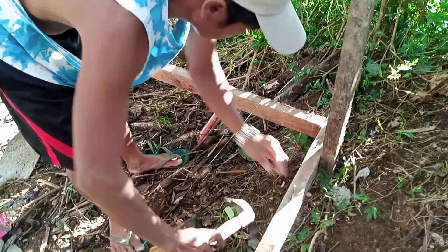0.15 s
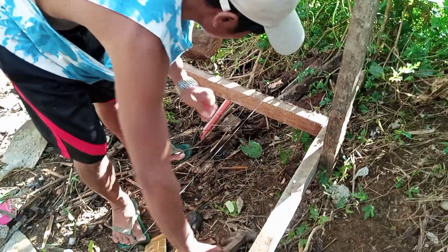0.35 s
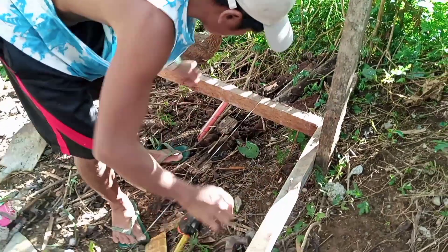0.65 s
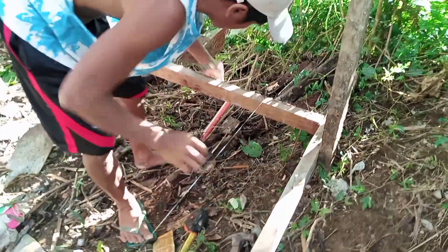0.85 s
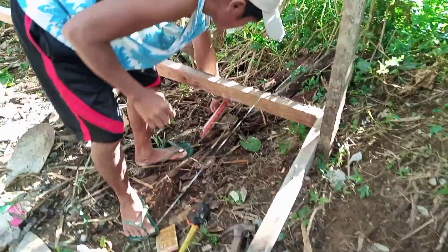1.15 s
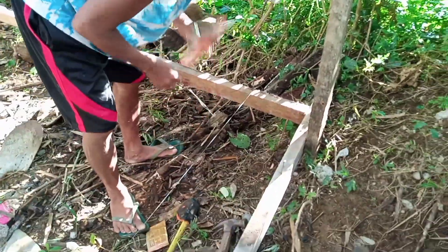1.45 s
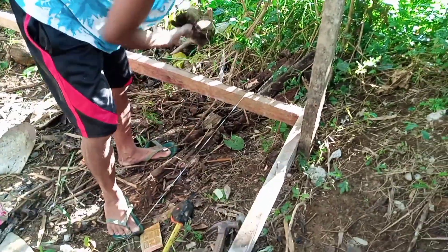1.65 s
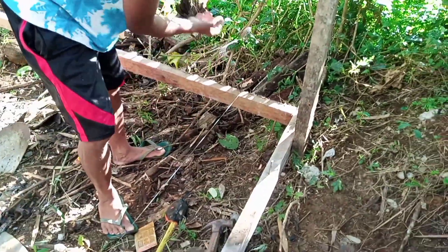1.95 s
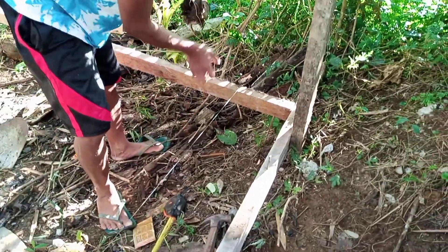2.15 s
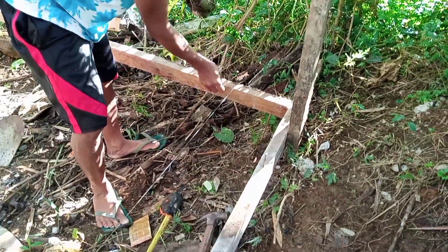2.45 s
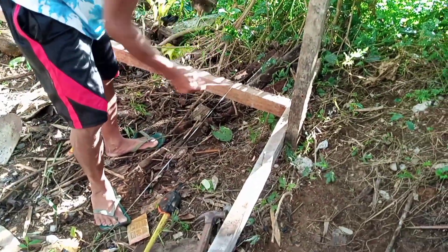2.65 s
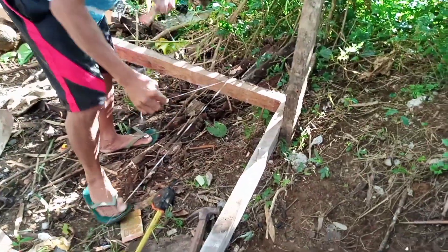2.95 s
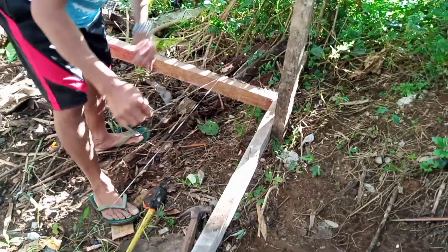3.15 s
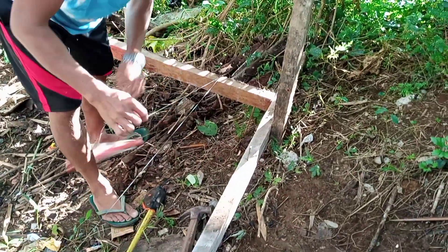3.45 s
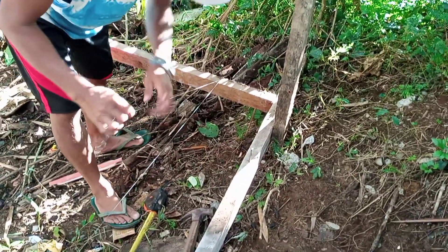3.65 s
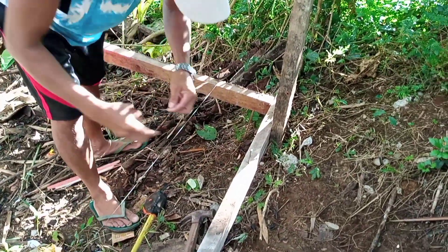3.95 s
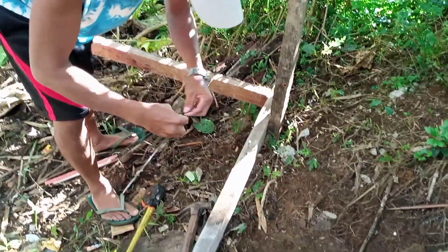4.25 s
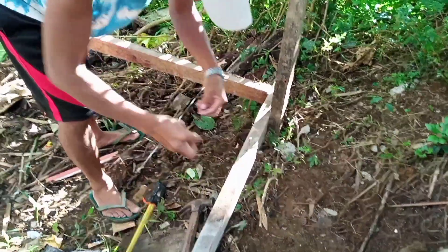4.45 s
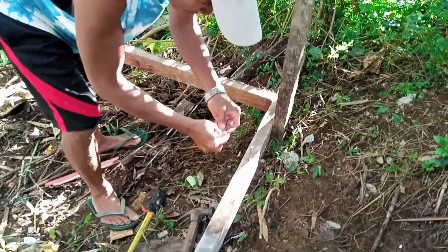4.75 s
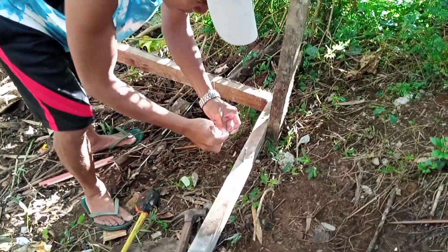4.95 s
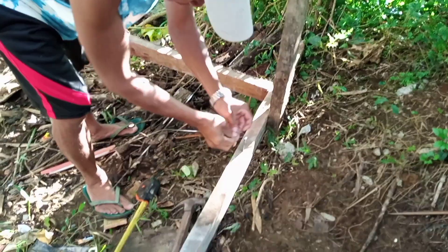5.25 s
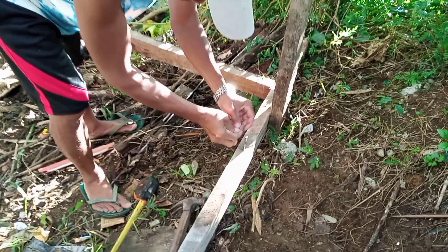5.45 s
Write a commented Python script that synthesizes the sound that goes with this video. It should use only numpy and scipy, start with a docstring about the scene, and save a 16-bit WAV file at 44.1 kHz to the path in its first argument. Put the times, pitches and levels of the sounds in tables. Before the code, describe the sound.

Close wooden knocks and scuffs in dry litter open the scene, followed by a single loud rooster crow with a brief metallic clatter near its end. Afterwards it grows quieter: soft rustles, small twig snaps, thinning chick peeps, distant fowl calls and faint dog yaps. A low far engine and thin high hiss run throughout, recorded in open air with light echoes from yard and trees.

```python
"""Farmyard rooster and timber work

A rooster crows once: harmonics through a throat filter, with flutter and rasp where the voice is rough.
A hammer scrapes and knocks on a timber frame, and feet shift in dry litter: noise bursts and crackle.
A piece of metal clatters as the crow ends: chattering contacts ring its modes. Chicks peep as gliding
whistles. Far off, harmonic tones make a yapping dog and other fowl, and an engine throbs in filtered
beats under a steady high hiss of coloured noise."""
import sys
import numpy as np
from scipy import signal
from scipy.fft import rfft, irfft
from scipy.io import wavfile
from scipy.ndimage import uniform_filter1d

SR = 44100
rng = np.random.default_rng(int(sys.argv[2]) if len(sys.argv) > 2 else 0)


def generate_wav(sig):
    """Save sig (samples, or channels by samples) to the path in sys.argv[1] as 16-bit PCM at SR."""
    pcm = np.round(np.clip(np.atleast_2d(sig).T, -1, 1) * 32767).astype(np.int16)
    wavfile.write(sys.argv[1], SR, pcm)


N = 247621

# spectrum of the hiss: f/Hz, level/dB
HISS_SPECTRUM = [(150, -58.5), (300, -17), (600, -22.5), (1000, -31), (1600, -28.5), (2400, -16),
                 (3300, -29), (4700, -10), (5200, -6.5), (5700, -1.5), (6300, -9), (7300, -1), (8500, 3),
                 (9400, -2.5), (10500, -1.5), (11300, -15), (12200, -30.5), (15500, -30)]
HISS_DB = -52
# spectrum of the engine throb: f/Hz, level/dB
THROB_SPECTRUM = [(20, -43), (40, -22), (65, -6.5), (95, 1.5), (135, 3.5), (165, -5.5), (200, -18),
                  (260, -27), (400, -49.5), (700, -88)]
# engine loudness over time: t/s, level/dB
THROB_LEVEL = [(0.15, -56), (2.99, -57), (4.49, -60), (4.88, -54), (5.6, -59.5)]
# echoes of the yard: f/Hz, t60/s
YARD_DECAY = [(200, 0.49), (1000, 0.326), (3500, 0.516), (8000, 0.34), (15000, 0.083)]
# echoes of the far tree line: f/Hz, t60/s
TREE_LINE_DECAY = [(300, 2.2), (800, 2.214), (1600, 1.7), (2500, 0.28), (5000, 0.25), (15000, .1)]
EDGE_HZ = 15600  # upper band limit of the recorder

# far fowl: start t/s, end t/s, start f/Hz, end f/Hz, fundamental level/dB, second harmonic level/dB,
# pitch waver/share
FAR_CALLS = [(2.549, 2.99, 768, 748.6, -81, -56, .002), (3.742, 4.018, 520, 420.4, -62, -91, 0.0456),
             (5.394, 5.49, 688, 775, -67.5, -91, .04)]
# distant dog: t/s, nominal f/Hz of the strongest harmonic, level/dB
YAPS = [(.122, 847.6, -49.5), (0.842, 948.5, -54), (2.925, 968, -54), (3.315, 949, -52), (3.695, 850, -51),
        (4.085, 925.3, -55)]

# near chicks: t/s, length/s, plunge/s, top f/Hz, relative level/dB
PEEPS = [(0.116, 0.1534, 0.049, 5575, -38.5), (0.157, 0.1558, 0.0575, 5059, -38.5),
         (0.459, 0.123, 0.0462, 5564, -33), (0.502, 0.1452, 0.049, 5210, -46),
         (0.723, 0.0407, 0.0176, 4265, -39.5), (0.784, 0.1393, 0.05205, 5940, -29.5),
         (0.794, .075, 0.035, 4203, -33.5), (1.113, 0.1148, 0.0302, 5991, -31.5),
         (1.213, 0.0749, 0.0262, 4176, -29.5), (1.523, 0.1686, 0.0855, 5240, -34.5),
         (1.853, 0.0882, 0.0375, 4407, -38), (1.922, 0.1403, 0.057, 5701, -33.5),
         (2.542, 0.1496, 0.067, 3854, -41.5), (2.716, 0.1202, 0.0302, 4879, -43),
         (2.813, 0.104, .052, 4963, -40.5), (3.086, 0.136, .06, 4734, -40.5),
         (3.114, .05, .04, 3398, -51.5), (3.245, 0.097, 0.0337, 4420, -48.5),
         (3.351, 0.048, .03, 3940, -51.5), (3.442, .135, .077, 5127, -43),
         (3.466, 0.1668, 0.051, 4600, -47), (3.768, 0.0985, 0.056, 4056, -49),
         (3.853, 0.1064, 0.075, 4494, -42), (4.196, 0.0652, 0.051, 4350, -53.5),
         (4.321, 0.0434, 0.0367, 4013, -39.5), (4.424, 0.11, 0.062, 4630, -50.5),
         (4.789, 0.0982, 0.0303, 4000, -45), (4.92, 0.0876, 0.0487, 3170, -54.5),
         (5.312, 0.069, 0.021, 2784, -55), (5.366, 0.0803, .015, 3560, -55.5)]
# quick reflections of the peeps: delay t/s, level/dB
REFLECTIONS = [(.006, -10.5), (.017, -12), (.034, -16.5), (.056, -15)]
PEEP_END_HZ, PEEP_JITTER = 2698, .011  # every peep plunges to the same pitch; jitter is a share of it
FLOCK_PER_S, FLOCK_DB, FLOCK_FADE_DB_PER_S = 6, -46.5, 4  # fainter chicks behind
FLOCK_HZ, FLOCK_LENGTH_S = (3720, 5516), (.07, 0.1)

# scrapes and steps in the litter: t/s, length/s, level/dB
SCUFFS = [(-.01, 0.0968, -32), (0.09, 0.65, -54), (0.361, 0.339, -49), (0.7, 0.1175, -47.5),
          (2.242, 0.059, -41.5), (3.17, 0.288, -53.5), (3.646, 0.117, -51.5), (3.74, 0.1308, -46),
          (4.031, 0.103, -48), (4.358, 0.107, -52), (4.445, 0.177, -62.5), (4.63, 0.067, -57.5),
          (4.994, 0.0873, -57.5)]
# spectrum of dry litter: f/Hz, level/dB
LITTER_SPECTRUM = [(40, -18.5), (130, 2), (300, -3), (600, -9), (1200, -3), (2000, 1), (4000, 0.5),
                   (7000, 3.5), (10000, -8.5), (12000, -24.5), (15000, -14)]
# knocks on timber and snapping twigs: t/s, level/dB, centre f/Hz, decay/s
KNOCKS = [(0.012, -35.5, 1060, 0.0135), (.027, -33.5, 207, 0.0101), (.045, -40.5, 404, 0.0113),
          (0.333, -25.5, 4020, 0.0013), (0.3638, -34.5, 2680, 0.00384), (0.694, -35, 1060, 0.00176),
          (0.802, -41, 699, 0.0043), (2.249, -34.5, 866, 0.0099), (3.678, -47.5, 5010, 0.0043),
          (4.686, -53.5, 2010, 0.003), (4.893, -51.5, 4490, 0.0038), (5.487, -42.5, 3610, 0.002)]
# spectrum of a knock: f as a multiple of its centre, level/dB
KNOCK_BODY = [(1 / 16, -45), (1 / 5, -20), (1 / 1.7, -2), (1, 0), (1.8, -6), (2.8, -30), (8, -48)]

# modes of the metal piece: f/Hz, t60/s, relative level/dB landing flat, relative level/dB landing on its end
METAL_MODES = [(1639, 0.49, -55.5, -12), (2016.5, 0.2, 6, -29), (2387, 0.25, -22.5, -8),
               (3870, .2, -23.5, -32.5), (3700, 0.132, 3, -29.5), (4463, 0.116, -14.5, 0),
               (5682, 0.067, -11, -46.5), (6313, 0.36, -13, -21.5), (6410, 0.18, -24, 6.5),
               (6456, .15, -11, 1.5), (7800, .15, -37.5, -34), (8575, 0.19, -28, -7.5),
               (10380, 0.131, -22, -24)]
# its landings: t/s, relative ring level/dB, crash level/dB, chatter time/s, share on its end/0-1
LANDINGS = [(2.297, -17, -26.5, 0.0427, 0.07), (2.426, -25, -35.5, 0.0247, 0.97)]
# spectrum of the metal crash: f/Hz, level/dB
CRASH_SPECTRUM = [(50, -47), (200, -33.5), (400, -25.5), (800, -3), (2000, 10), (3000, 10.5), (5000, 4.5),
                  (6500, 13), (10300, 5.5), (11500, -3.5), (13500, -7), (15200, 2)]

# throat response to the overtones: f/Hz, level/dB
THROAT = [(1900, 10), (2600, 0), (3400, 7), (4200, -10), (4700, -1), (5200, -15), (6000, -12.5),
          (6700, -17), (7500, -23), (8600, -16), (9500, -17), (11000, -25), (12500, -35), (15000, -31.5)]
# spectrum of the breathy rasp: f/Hz, level/dB
RASP_SPECTRUM = [(450, -35.5), (650, -4.5), (900, -13.5), (1400, -7), (1800, 3), (2100, -12.5), (2700, -10),
                 (3700, -12.5), (5000, -13), (7000, -15), (10000, -31.5), (14000, -40.5)]
RASP_DB, RASP_JUDDER_DB, RASP_JUDDER_HZ = 1, 1.5, 130
FLUTTER_CLEAN, FLUTTER_ROUGH, UNDERTONE = 0.0023, .027, 0.387  # flutter as a share of pitch
PHASE_BLUR = .06  # radians per harmonic number above the third: the high overtones blur

# short syllables that open the crow: t/s, length/s, f/Hz, level/dB, second harmonic level/dB re first,
# relative overtone level/dB, roughness/0-1
SYLLABLES = [(0.956, .16, 676.7, -31, -9, -7.5, 0.11), (1.107, 0.1163, 675.1, -37.5, -4.5, -8, .16),
             (1.245, .165, 891.6, -29.5, -1, -8.5, 0.43)]
ARCH, ENDS_DB, ENDS_ROUGH = .055, -15.5, .22  # at its ends a syllable is flatter, softer and rougher
OVERTONE_SHARE = 0.27  # how far the upper harmonics follow that swell
SYLLABLE_FADE_S = 0.016

# two strong partials of the long note: t/s, relative fundamental level/dB, relative second harmonic level/dB
LONG_PARTIALS = [(1.45, -33, -44.5), (1.482, -29.5, -29), (1.618, -26, -27.5), (1.66, -34, -30.5),
                 (1.726, -23.5, -20), (1.778, -41, -25), (1.892, -22.5, -20), (1.96, -51, -23.5),
                 (2.036, -43, -21.5), (2.074, -40, -48), (2.104, -34.5, -23.5), (2.254, -40.5, -37),
                 (2.294, -31.5, -28), (2.538, -35, -41.5), (2.62, -51.5, -42.5)]
# pitch of the long note ahead of its sinking end: t/s, f/Hz
LONG_PITCH = [(1.5, 882.1), (1.726, 890.4), (1.774, 849.1), (1.886, 860.7), (2.264, 813.2), (2.27, 816.8)]
LONG_START_S, LONG_END_S, LONG_ATTACK_S, LONG_RELEASE_S = 1.435, 2.64, 0.036, 0.048
LONG_LEVEL_DB = -0.7542  # overall level of the long note
ONSET_ROUGH, CLEAR_S = 0.8825, 0.0857  # the long note starts hoarse and clears
# it brightens as the beak opens (relative overtone levels)
OVERTONES_START_DB, OVERTONES_TOP_DB, BRIGHTEN_S = -40, -33, 0.3
SAG_HZ_PER_S = 170  # the pitch keeps sinking as the air runs out
COLLAPSE_S, COLLAPSE_HZ_PER_S, COLLAPSE_ROUGH_PER_S = 2.42, 330, 7  # then the voice gives way
OVERTONES_FALL_DB_PER_S, COLLAPSE_FADE_DB_PER_S = 135, 28

# breaks, where a second, lower tone sounds in the syrinx: t/s, length/s, f/Hz, level/dB
BREAKS = [(1.165, .1, 566.1, -39.5), (1.344, .125, 578.7, -41.5), (2.48, 0.10112, 603.6, -42)]
# spectrum of that tone: f/Hz, level/dB
BREAK_PARTIALS = [(570, -7.5), (1140, 2), (1710, -5), (2280, -6), (2850, -13)]


def amp(db):
    """Decibels to gain."""
    return 10 ** (np.asarray(db) / 20)


def evened(x):
    """Scales to rms 1."""
    return x / np.sqrt(np.mean(x ** 2) + 1e-20)


def read(points, hz):
    """Reads a spectrum or decay table on a log-frequency axis."""
    f, value = np.transpose(points)
    return np.interp(np.log(hz + 1), np.log(f + 1), value)


def curves(rows, t):
    """Every column of a table at the times t."""
    s, *columns = np.transpose(rows)
    return [np.interp(t, s, c) for c in columns]


def add(mix, s, sound):
    """Mixes a sound in at time s, cut to fit the scene."""
    at = round(s * SR)
    sound = sound[max(-at, 0):]
    part = mix[max(at, 0):][:len(sound)]
    part += sound[:len(part)]


def colour(x, points):
    """Gives x a spectrum, at rms 1."""
    gain = amp(read(points, np.fft.rfftfreq(len(x), 1 / SR)))
    return evened(irfft(rfft(x) * gain, len(x)))


def wander(size, hz):
    """Smooth random drift up to a rate, around rms 1."""
    f = np.fft.rfftfreq(size + SR, 1 / SR)
    spectrum = rfft(rng.standard_normal(size + SR)) / (1 + (f / hz) ** 4)
    return evened(irfft(spectrum, size + SR))[:size]


def fade(t, edge):
    """Soft start and end."""
    return np.clip(np.minimum(t - t[0], t[-1] - t) / edge, 0, 1)


def phase_of(hz):
    """Running phase of a pitch curve."""
    return 2 * np.pi * np.cumsum(hz) / SR


def grains(size, per_s, spread_db):
    """Random tiny contacts of uneven strength."""
    hits = rng.standard_normal(size) * (rng.random(size) < per_s / SR)
    return hits * amp(spread_db * np.minimum(rng.exponential(1, size), 3))


def reverberate(x, decays):
    """Scattered echoes from trees and walls, each frequency band dying at its own rate."""
    t = np.arange(2 * SR) / SR
    taps = rng.standard_normal(len(t)) * (rng.random(len(t)) < 2000 / SR) * (t > .012)
    hz, s, z = signal.stft(taps, SR, nperseg=256)
    dying = amp(-60 * s / read(decays, hz)[:, None])
    tail = signal.istft(z * dying, SR, nperseg=256)[1]
    return signal.fftconvolve(x, tail / np.linalg.norm(tail))[:N]


def yard(x):
    """Quick echoes close by, and a faint long roll from the tree line."""
    return reverberate(x, YARD_DECAY) + amp(-19.5) * reverberate(x, TREE_LINE_DECAY)


def hiss():
    """An even high hiss of coloured noise."""
    return colour(rng.standard_normal(N), HISS_SPECTRUM) * amp(HISS_DB)


def engine():
    """Uneven firing beats of a far engine, mixed with noise and kept to the bass."""
    turns = np.cumsum(19.5 * (1 + 0.09919 * wander(N, hz=4.4))) / SR
    # one click each time the turn count steps up
    beats = np.diff(np.floor(turns), prepend=0) * (1 + 0.22 * wander(N, hz=38.91))
    throb = colour(evened(beats) + rng.standard_normal(N), THROB_SPECTRUM)
    return throb * amp(curves(THROB_LEVEL, np.arange(N) / SR)[0])


def far_fowl():
    """Held, wavering notes of two harmonics."""
    out = np.zeros(N)
    for start, end, start_hz, end_hz, first_db, second_db, waver in FAR_CALLS:
        t = np.arange(start, end, 1 / SR)
        glide = np.linspace(start_hz, end_hz, len(t))
        phase = phase_of(glide * (1 + waver * wander(len(t), hz=89.7)))
        tone = amp(first_db) * np.sin(phase) + amp(second_db) * np.sin(2 * phase)
        add(out, start, fade(t, 0.0425) * amp(2 * wander(len(t), hz=25)) * tone)
    return out


def far_dog():
    """Short rough yaps, pitch and loudness rising and falling in one arch."""
    out, t = np.zeros(N), np.arange(0, .06, 1 / SR)
    arch = np.sin(np.pi * t / t[-1])
    for s, hz, db in YAPS:
        phase = phase_of(hz / 2 * (.78 + .25 * arch + .045 * wander(len(t), hz=200)))
        tone = 0.078 * np.sin(phase) + np.sin(2 * phase) + 0.32 * np.sin(3 * phase)
        add(out, s, amp(db) * evened(arch * tone))
    return out


def peep(start, length, plunge, top_hz, db):
    """A thin whistle that creeps in, arches, and grows loud as it plunges."""
    t = np.arange(0, length, 1 / SR)
    knee = max(length - plunge, .005)
    marks = [0, .35 * knee, knee, knee + .4 * (length - knee), length]
    mid_hz = 0.43 * top_hz + .55 * PEEP_END_HZ
    hz = np.interp(t, marks, [.95 * top_hz, top_hz, .94 * top_hz, mid_hz, PEEP_END_HZ])
    hz = uniform_filter1d(hz, 500) * (1 + PEEP_JITTER * wander(len(t), hz=115.6))
    swell_db = np.interp(t, marks, [-13.5, -13, -9.5, -1.0, -18.5])
    level_db = db + swell_db + 3 * wander(len(t), hz=60.4)
    return start, np.sqrt(2) * amp(level_db) * fade(t, 0.004) * np.sin(phase_of(hz))


def flock():
    """Faint peeps at random, heard only by their echoes in the yard."""
    out = np.zeros(N)
    for k, (when, size, pitch) in enumerate(rng.random((int(FLOCK_PER_S * N / SR), 3))):
        s = (k + when) / FLOCK_PER_S
        length = np.interp(size, [0, 1], FLOCK_LENGTH_S)
        top_hz = np.interp(pitch, [0, 1], FLOCK_HZ)
        add(out, *peep(s, length, length / 2, top_hz, FLOCK_DB - FLOCK_FADE_DB_PER_S * s))
    return reverberate(out, YARD_DECAY)


def chicks():
    """The near peeps, smeared by a few quick reflections from posts and walls."""
    out = np.zeros(N)
    for row in PEEPS:
        add(out, *peep(*row))
    direct = out.copy()
    for delay, db in REFLECTIONS:
        add(out, delay, amp(db) * direct)
    return amp(-0.5) * out


def scuffs():
    """Clumps of crackle where things drag through dry litter."""
    out = np.zeros(N)
    for s, length, db in SCUFFS:
        u = np.linspace(0, 1, int(length * SR))
        stroke = np.interp(u, [0, .2, .55, 1], [.08, 1, 0.669, 0.046])
        stroke = stroke * amp(2.4 * wander(len(u), hz=58.9))
        crackle = colour(grains(len(u), per_s=9000, spread_db=1.5), LITTER_SPECTRUM)
        add(out, s, amp(db) * stroke * crackle)
    return out


def knocks():
    """Dead knocks: noise around a centre frequency, dying fast with a faint longer tail."""
    out, t = np.zeros(N), np.arange(SR // 8) / SR
    for s, db, hz, decay in KNOCKS:
        body = [(hz * ratio, body_db) for ratio, body_db in KNOCK_BODY]
        dying = 1.24 * np.exp(-t / decay) + 0.025 * np.exp(-t / 0.023)
        knock = colour(rng.standard_normal(len(t)), body) * dying
        add(out, s, amp(db) * knock * np.linalg.norm(dying) / np.linalg.norm(knock))
    return out


def metal():
    """Each landing is a burst of chattering contacts that pumps up the metal's modes."""
    out, t = np.zeros(N), np.arange(SR // 2) / SR
    loud = SR // 16  # opening samples that set the level
    for s, ring_db, crash_db, chatter, on_end in LANDINGS:
        contacts = grains(len(t), per_s=5000, spread_db=-2.5)
        dying = np.minimum(.5 + t / 0.01, 1) * np.exp(-np.maximum(t - .025, 0) / chatter)
        crash = colour(contacts, CRASH_SPECTRUM) * dying
        add(out, s, amp(crash_db) * crash / np.std(crash[:loud]))
        for hz, t60, flat_db, end_db in METAL_MODES:
            mode = amp(-60 * t / t60) * np.sin(2 * np.pi * hz * t)
            ring = signal.fftconvolve(contacts * dying, mode)[:len(t)]
            mode_db = ring_db + np.interp(on_end, [0, 1], [flat_db, end_db]) - 13.0
            add(out, s, amp(mode_db) * ring / np.std(ring[:2 * loud]))
    return out


def syrinx(t, hz, first_db, second_db, over_db, rough):
    """A stack of harmonics through the throat; roughness adds flutter, side tones and rasp."""
    size = len(t)
    rough = np.clip(rough, 0, 1)
    flutter = FLUTTER_CLEAN + FLUTTER_ROUGH * rough
    phase = phase_of(hz * (1 + flutter * (wander(size, hz=166.37) + 0.5 * wander(size, hz=36.2))))
    orders = np.arange(3, 20)[:, None]
    throat = amp(read(THROAT, orders * hz))
    # the third and fourth harmonics together set the overtone level
    throat *= amp(over_db - 4.0) / np.linalg.norm(throat[:2], axis=0)
    gains = np.vstack([amp(first_db), amp(second_db), throat])
    voice = np.zeros(size)
    for k, gain in enumerate(gains, 1):
        blur = PHASE_BLUR * max(k - 3, 0) * wander(size, hz=150)
        partial = gain * np.cos(k * phase + rng.uniform(0, 2 * np.pi) + blur)
        # the overtones waver unevenly in level, as when echoes interfere
        voice += np.sqrt(2) * partial * amp((3.3 if k > 2 else .3) * wander(size, hz=40.68))
    # the loudness beats unevenly, as with close reflections, more when rough
    voice *= 1 + 14 * flutter * wander(size, hz=75)
    voice *= amp(np.minimum(170 * flutter, 3) * wander(size, hz=38))
    # when very rough, every third cycle is stronger: side tones between the harmonics
    voice *= 1 + UNDERTONE * rough ** 2 * np.cos(phase / 3 + 0.66 * wander(size, hz=40))
    breath = rng.standard_normal(size) * (1 + 0.23 * np.cos(phase))
    rasp = colour(breath, RASP_SPECTRUM) * amp(RASP_JUDDER_DB * wander(size, hz=RASP_JUDDER_HZ))
    return voice + rasp * amp(RASP_DB) * rough ** 1.286 * np.linalg.norm(gains, axis=0)


def syllable(start, length, hz, db, second_db, over_db, rough):
    """Pitch, loudness and clearness follow one arch of effort."""
    t = np.arange(0, length, 1 / SR)
    slack = 1 - np.sin(np.pi * t / length)
    droop_db = ENDS_DB * slack
    upper_db = db + OVERTONE_SHARE * droop_db
    voice = syrinx(t, hz * (1 - ARCH * slack), db + droop_db, upper_db + second_db,
                   upper_db + over_db, rough + ENDS_ROUGH * slack ** 2)
    return start, voice * fade(t, SYLLABLE_FADE_S)


def long_note():
    """Starts hoarse, clears, sinks slowly and collapses into a rasp."""
    t = np.arange(LONG_START_S, LONG_END_S, 1 / SR)
    age, spent = t - t[0], np.maximum(t - COLLAPSE_S, 0)
    hz = uniform_filter1d(curves(LONG_PITCH, t)[0], 800)
    hz = hz - SAG_HZ_PER_S * np.maximum(t - LONG_PITCH[-1][0], 0) - COLLAPSE_HZ_PER_S * spent
    rough = ONSET_ROUGH * np.exp(-age / CLEAR_S) + COLLAPSE_ROUGH_PER_S * spent
    over_db = np.interp(age, [0, BRIGHTEN_S], [OVERTONES_START_DB, OVERTONES_TOP_DB])
    over_db = over_db - OVERTONES_FALL_DB_PER_S * spent
    first_db, second_db = curves(LONG_PARTIALS, t)
    envelope = np.minimum(age / LONG_ATTACK_S, 1) * np.minimum((t[-1] - t) / LONG_RELEASE_S, 1)
    envelope = envelope * amp(LONG_LEVEL_DB - COLLAPSE_FADE_DB_PER_S * spent)
    return t[0], envelope * syrinx(t, hz, first_db, second_db, over_db, rough)


def voice_break(start, length, hz, db):
    """A brief, unsteady lower tone that slides down."""
    t = np.arange(0, length, 1 / SR)
    phase = phase_of(hz * (1 - .4 * (t - length / 2) + .014 * wander(len(t), hz=120)))
    tone = np.zeros(len(t))
    for k in range(1, 6):
        level_db = read(BREAK_PARTIALS, k * hz) + 5.1 * wander(len(t), hz=60)
        tone += amp(level_db) * np.sin(k * phase)
    return start, amp(db) * evened(tone) * fade(t, 0.036)


def rooster():
    """Short syllables and a long note, with lower tones where the voice breaks."""
    out = np.zeros(N)
    for row in SYLLABLES:
        add(out, *syllable(*row))
    add(out, *long_note())
    for row in BREAKS:
        add(out, *voice_break(*row))
    # a high-pass keeps the low side tones of the voice faint
    return signal.sosfilt(signal.butter(8, 570, "high", fs=SR, output="sos"), out)


def scene():
    """Mixes the dry sources with their yard echoes, the flock, engine and hiss."""
    far, peeps, near, crow = far_fowl() + far_dog(), chicks(), scuffs() + knocks() + metal(), rooster()
    sends = amp(-14.5) * far + amp(-13.0) * peeps + amp(-10.5) * near + amp(-10.0) * crow
    return (hiss() + engine() + far + flock() + peeps + near + crow + yard(sends))[None]


def record(dry):
    """The recorder's band limit: a steep low-pass."""
    low_pass = signal.firwin(511, EDGE_HZ, window=("kaiser", 9), fs=SR)
    return signal.oaconvolve(dry, low_pass[None], "same")


dry = scene()
out = record(dry)
generate_wav(out)
```